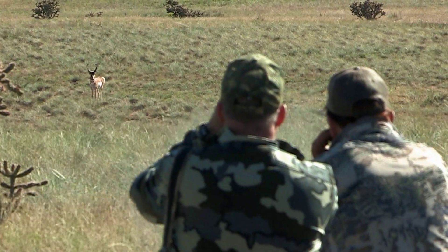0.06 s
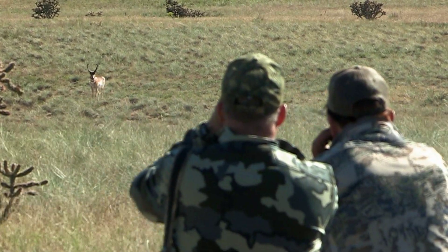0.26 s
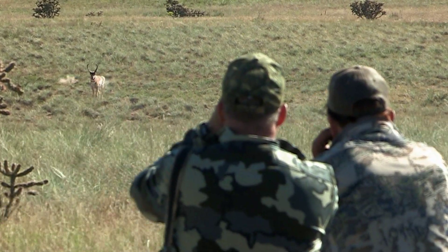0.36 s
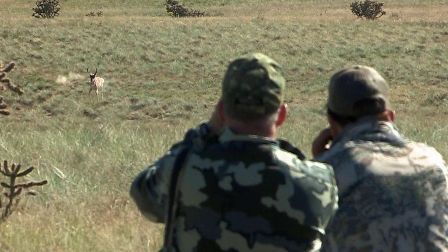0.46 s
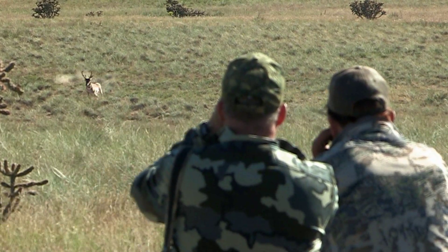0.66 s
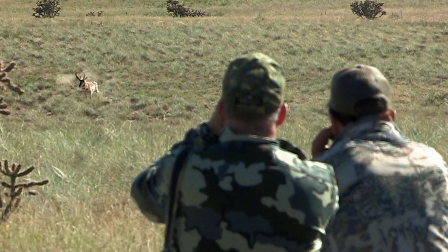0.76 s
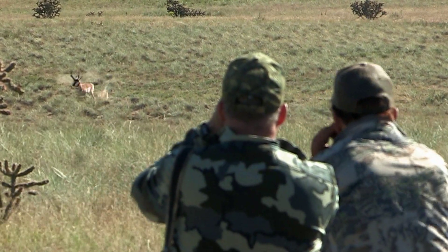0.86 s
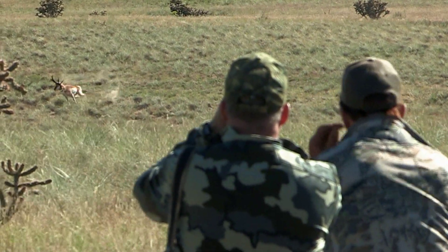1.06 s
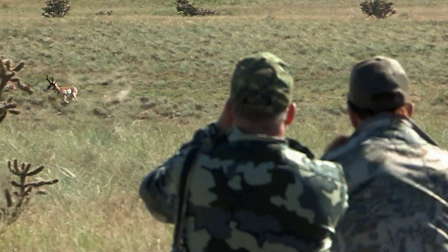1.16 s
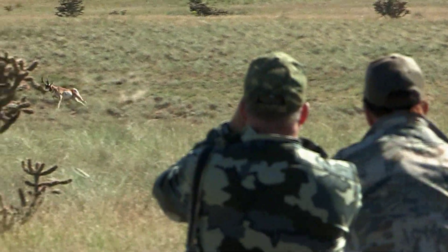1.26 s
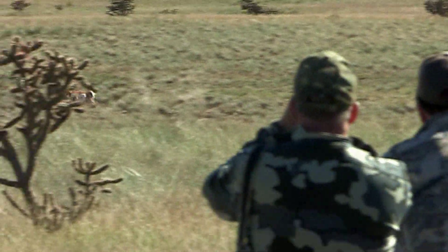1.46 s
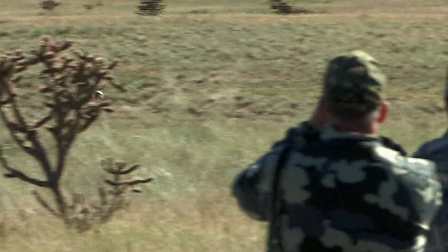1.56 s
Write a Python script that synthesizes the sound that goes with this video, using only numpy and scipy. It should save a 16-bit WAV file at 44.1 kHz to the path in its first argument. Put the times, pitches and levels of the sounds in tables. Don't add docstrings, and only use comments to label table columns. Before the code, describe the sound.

One close, overloaded gunshot with a sharp crack and hollow blast, then a fading echo outdoors

```python
import sys
import numpy as np
from scipy import signal
from scipy.fft import rfft, irfft
from scipy.io import wavfile
from scipy.ndimage import uniform_filter1d

SR = 44100
rng = np.random.default_rng(int(sys.argv[2]) if len(sys.argv) > 2 else 0)


def elevation(decibels):
    levels = np.asarray(decibels, float)
    return 10 ** (levels / 20)


def int16_out(signal):
    q = np.round(np.clip(np.atleast_2d(signal).T, -1, 1) * 32767)
    wavfile.write(sys.argv[1], SR, q.astype(np.int16))


N = 70560
SHOT_S = 0.2693


def evened(x):
    return x / np.sqrt(np.mean(x ** 2) + 1e-20)


def steady(x, size):
    return x / np.sqrt(uniform_filter1d(x ** 2, size) + 0.24)


def wander(size):
    return evened(uniform_filter1d(uniform_filter1d(rng.standard_normal(N), size), size))


def read(points, hz):
    f, value = np.transpose(points)
    return np.interp(np.log(hz + 1), np.log(f + 1), value)


def curve(points, t):
    return np.interp(t, *np.transpose(points))


def coloured(points):
    hz = np.fft.rfftfreq(N, 1 / SR)
    edge = np.minimum(hz / points[0][0], 1) ** 2
    spectrum = rfft(rng.standard_normal(N)) * elevation(read(points, hz)) * edge
    return evened(irfft(spectrum, N))


def resonate(x, hz, width):
    turn = np.exp(2j * np.pi * hz * np.arange(len(x)) / SR)
    r = np.exp(-np.pi * width / SR)
    smoothed = signal.lfilter([1 - r], [1, -r], x / turn + 1e-18)
    return 2 * (turn * smoothed).real


def burst(rise, hold, t60, start=SHOT_S):
    t = np.arange(N) / SR - start
    return np.clip(t / rise, 0, 1) * elevation(-60 * np.maximum(t - hold, 0) / t60)


def swell(middle, length):
    return np.exp(-((np.arange(N) / SR - middle) / length) ** 2)


def snaps(table):
    out = np.zeros(N + 2000)
    t = np.arange(2000) / SR
    for s, db, hz, width, t60 in table:
        snap = rng.standard_normal(2000)
        for _ in range(3):
            snap = resonate(snap, hz, width)
        start = round(s * SR)
        rise = np.minimum(t / 0.00074, 1)
        out[start:start + 2000] += evened(snap) * rise * elevation(db - 60 * t / t60)
    return out[:N]


def wind():
    # (time [s], level [dB])
    gusts = [(0.0, -24.5), (0.034, -23.5), (0.088, -24.5), (0.114, -22.5), (0.19, -25.5), (0.218, -22),
             (0.248, -20), (0.276, -16), (0.328, -22.5), (0.48, -22), (0.498, -28), (0.552, -27),
             (0.752, -28), (0.79, -35.5), (.82, -31.5), (0.926, -33), (1.398, -35.5), (1.438, -30),
             (1.6, -29.5)]
    # (frequency [Hz], level per Hz [dB])
    wind_colour = [(12, -50.5), (20, -6.5), (65, -0.5), (248, -16.5), (354, -19.5), (573, -24.5),
                   (677, -27.5), (1380, -30), (3000, -42.5), (3900, -53), (6600, -120)]
    lump_top_hz, lumps_db = 221, 1.5
    x = coloured(wind_colour)
    low = signal.sosfiltfilt(signal.butter(2, lump_top_hz, fs=SR, output="sos"), x)
    gust_db = curve(gusts, np.arange(N) / SR)
    roar_db = 0.68 * uniform_filter1d(gust_db, size=2000) - 10.0
    buffeting = steady(low, size=2500) * elevation(gust_db + lumps_db * wander(size=500))
    return buffeting + (x - low) * elevation(roar_db)


def drone():
    low_hz, top_hz, level_db = 700, 1720, -48
    sos = signal.butter(6, [low_hz, top_hz], "band", fs=SR, output="sos")
    band = signal.sosfilt(sos, rng.standard_normal(N))
    return evened(band) * elevation(level_db) * swell(1.42, 0.19)


def rustle():
    # (time [s], level [dB])
    hiss_level = [(0, -47.5), (.033, -51.5), (.038, -39.5), (.09, -45), (.14, -40.5), (.195, -45), (.2, -42),
                  (.27, -40), (.4, -73), (1.05, -71), (1.15, -60.5), (1.22, -60), (1.26, -56), (1.31, -58),
                  (1.45, -55), (1.56, -52.5), (1.6, -48.5)]
    # (frequency [Hz], level per Hz [dB])
    hiss_colour = [(880, -12), (1500, -15), (2470, 4), (2670, -3.5), (3960, -1.5), (9370, -6), (15600, -15)]
    # (frequency [Hz], level per Hz [dB])
    brush_colour = [(88, -31), (150, 0), (400, -22), (505, -8.5), (1050, -16), (8000, -34), (10400, -57.5),
                    (17600, -120)]
    brush_s, brush_db, brush_rise_s = 0.202, -29.5, 0.002
    z = signal.stft(coloured(hiss_colour), nperseg=256, noverlap=192)[2]
    patches = uniform_filter1d(rng.standard_normal(z.T.shape), 25, 0)
    patches = evened(uniform_filter1d(patches, 10, 1)).T
    hiss = evened(signal.istft(z * elevation(2.0 * patches), nperseg=256, noverlap=192)[1][:N])
    hiss = hiss * elevation(curve(hiss_level, np.arange(N) / SR) + 0.81 * wander(size=150))
    brush_shape = burst(brush_rise_s, SHOT_S - brush_s, 0.14, brush_s)
    return hiss + elevation(brush_db) * coloured(brush_colour) * brush_shape


def noise_swells():
    # (middle [s], level [dB], pitch [Hz], width [Hz], length [s])
    soft_swells = [(1.26, -61, 7500, 3000, .015), (1.26, -54, 3500, 1800, .03), (.055, -46, 2500, 3000, .015),
                   (1.587, -52, 11500, 3000, .012), (.236, -44, 4300, 300, .01), (1.52, -61, 12500, 5000, .04),
                   (.352, -30, 800, 800, .025), (.397, -31, 2000, 2500, .01), (.462, -38, 2200, 2500, .018),
                   (1.137, -64, 10000, 6000, .01), (.235, -36, 270, 120, .02), (.853, -47, 2000, 1400, .03)]
    out = np.zeros(N)
    for s, db, hz, width, length in soft_swells:
        band = resonate(resonate(rng.standard_normal(N), hz, width), hz, width)
        out += elevation(db) * evened(band) * swell(s, length)
    return out


def ticks():
    # (time [s], level [dB], pitch [Hz], width [Hz], t60 [s])
    small_snaps = [(0.3258, -20, 7460, 2500, 0.0088), (.480, -40, 11920, 6000, .008),
                   (.938, -45, 6960, 4000, 0.0074), (.941, -46, 11000, 8000, .006),
                   (.988, -48, 5000, 3500, .015), (1.004, -46.5, 4500, 4000, 0.042),
                   (1.004, -40.5, 2980, 2000, 0.029), (1.021, -62, 12800, 4000, .005),
                   (1.051, -45, 3950, 2000, 0.0084), (1.063, -59, 12000, 6960, 0.0056),
                   (1.176, -48, 12000, 6000, 0.023), (1.18, -46, 11000, 6000, .006),
                   (.847, -44, 2560, 1500, .04), (.801, -44, 3900, 1500, 0.034)]
    return snaps(small_snaps)


def knocks():
    # (middle [s], level [dB], pitch [Hz], length [cycles])
    swings = [(.302, -4.5, 277, 2.57), (.291, -8.5, 516, 3.3), (.2985, -12.5, 636, 5),
              (.2706, -7.5, 5100, 2.4), (.272, -12, 11800, 4), (0.25, -10, 3200, 0.66),
              (.282, -9.5, 9700, .7), (.2855, -12, 6600, 0.41), (0.32, -13, 2600, 0.57),
              (.2932, -13, 7000, 0.77), (0.36, -23, 6500, 3.5), (1.0071, -19, 190, 0.54),
              (0.95, -29, 650, 1.1), (1.312, -37.5, 520, 5.8), (0.47, -21, 146, 4.4),
              (.472, -20, 102.4, 2.6), (0.31, -23, 47, 1.1), (.57, -24, 42.3, 2), (.67, -25, 39.6, 2.5),
              (0.51, -29, 154, 4.4), (1.452, -27, 108, 2), (0.25, -23.5, 70, 2.3),
              (1.1797, -26.5, 12300, 2.5), (1.3, -36, 8300, 1.7), (1.1797, -36, 4500, 1.3),
              (1.1542, -48, 14000, .8), (1.1542, -39, 4000, 1.2), (1, -42, 7000, 1.8),
              (.9415, -44, 12500, 2)]
    out = np.zeros(N)
    for s, db, hz, cycles in swings:
        u = (np.arange(N) / SR - s) * hz
        out -= elevation(db) * np.cos(2 * np.pi * u) * np.exp(-(u / cycles) ** 2)
    return out


def echo():
    # (time [s], level [dB])
    roll = [(.3, -17), (.33, -27), (.38, -25), (.48, -31.5), (.51, -32), (.74, -36), (.78, -40.5),
            (.93, -43.5), (1.1, -49)]
    # (frequency [Hz], level per Hz [dB])
    roll_colour = [(59, -31), (100, -3), (621, -7), (836, -11.5), (970, -16.5), (1450, -14.5),
                   (10500, -30.5), (16000, -36.5)]
    returns_s = [.316, .345, .385, .398, .462, .853, .92]
    # (level relative to the roll [dB], length [s])
    returns = [(5, .005), (1.5, .025), (1, .012), (-4, .008), (5, .02), (2, .02), (2, .02)]
    air_db_per_s, air_power = 36, 2.35
    flicker_db, patch_db = 0.8, 1.2
    frames = N // 64 + 5
    hz = np.fft.rfftfreq(256, 1 / SR)[:, None]
    a, b, patches = rng.standard_normal((frames, 129, 3)).T
    patches = evened(uniform_filter1d(uniform_filter1d(patches, 8, 0), 20, 1))
    late = np.maximum(np.arange(frames) * 64 / SR - roll[0][0], 0)
    air_loss_db = air_db_per_s * late * (hz / 10000) ** air_power
    colour = elevation(read(roll_colour, hz)) * np.minimum(hz / 150, 1)
    z = (a + 1j * b) * colour * elevation(patch_db * patches - air_loss_db)
    scatter = evened(signal.istft(z, nperseg=256, noverlap=192)[1][:N])
    t = np.arange(N) / SR
    level_db = curve(roll, t) + flicker_db * wander(size=300)
    for s, (db, length) in zip(returns_s, returns):
        level_db += db * swell(s, length)
    level_db -= 30 * np.maximum(t - roll[-1][0], 0)
    return scatter * elevation(level_db + 2.0) * burst(0.024, 9, 1)


def cracks():
    # (time [s], level [dB], pitch [Hz], width [Hz], t60 [s])
    shot_snaps = [(0.3, -31, 4000, 7300, 0.042), (.268, -26.5, 5600, 7000, 0.027),
                  (0.271, -11.5, 5400, 3500, 0.013), (0.271, -15, 15070, 3000, .018),
                  (0.2709, -13, 11550, 3000, 0.018), (.2712, -8, 940, 500, 0.03),
                  (0.271, -11.5, 2260, 2500, .02), (0.2747, -10, 1700, 1200, 0.016),
                  (0.2757, -18.5, 5000, 7000, 0.0067), (0.2782, -10.5, 4500, 6000, 0.012),
                  (0.2818, -5.5, 3000, 3500, 0.013), (0.2828, -12, 7050, 8000, 0.012),
                  (0.283, -14, 6000, 8000, .01), (0.287, -18, 4500, 7000, 0.014),
                  (0.2918, -19, 11460, 3490, 0.011), (0.2929, -21, 3490, 6000, 0.0099),
                  (.297, -19, 4000, 7000, 0.021), (0.28, -24, 2150, 1800, 0.033)]
    return snaps(shot_snaps)


def blast():
    # (pitch [Hz], width [Hz], level [dB], peak after [s], t60 [s])
    hollows = [(272, 58, -10, 0.036, 0.022), (362.6, 142, -3, 0.012, 0.2), (523.6, 119, 0.5, 0.023, 0.05),
               (662, 80, -1.5, 0.03, 0.043), (794, 86, -7.5, 0.029, 0.1), (924, 187, -6, 0.025, 0.13),
               (1700, 1100, -10.5, 0.0051, 0.071), (98, 32, -22, 0.013, 0.14)]
    # (frequency [Hz], level per Hz [dB])
    fizz_colour = [(530, -41), (900, -2), (2330, 1), (2760, 1.5), (6250, -10), (12400, -17), (16000, -30)]
    shocks_per_s, shock_s, shock_spread_db = 1500, 0.00025, 3
    blast_db, blast_rise_s = 0.5, 0.0055
    crack_db, crack_rise_s, crack_t60_s, crack_hz = -13, 0.00088, 0.018, 4500
    fizz_db, fizz_rise_s, fizz_hold_s, fizz_t60_s = -14, 0.0035, 0.021, 0.036
    push_db, push_s, push_fade, push_sag = -7, 0.004, 0.22, 0.62

    u = np.arange(400) / SR / shock_s
    shock = (1 - u) * np.exp(-u)
    hits = (rng.random(N) < shocks_per_s / SR) * elevation(shock_spread_db * rng.standard_normal(N))
    shocks = np.convolve(hits * rng.choice([-1, 1], N), shock)[:N]
    body = np.zeros(N)
    for hz, width, db, peak, t60 in hollows:
        ring = evened(resonate(resonate(shocks, hz, width), hz, width))
        shape = burst(max(peak, blast_rise_s), peak, t60) ** 0.67
        body += elevation(db) * steady(ring, size=400) * shape

    sos = signal.butter(2, crack_hz, "high", fs=SR, output="sos")
    crack = signal.sosfilt(sos, rng.standard_normal(N))
    crack = crack * burst(crack_rise_s, 2 * crack_rise_s, crack_t60_s)
    fizz = coloured(fizz_colour) * elevation(2.76 * wander(size=25))
    fizz = fizz * burst(fizz_rise_s, fizz_hold_s, fizz_t60_s)
    v = np.maximum(np.arange(N) / SR - SHOT_S - 0.002, 0) / push_s
    push = -np.sin(np.pi * v ** push_sag) * np.exp(-push_fade * v)
    return elevation(blast_db) * body / 2 + elevation(push_db) * push + elevation(crack_db) * crack + elevation(fizz_db) * fizz


def scene():
    background = wind() + drone() + rustle() + noise_swells()
    details = ticks() + knocks()
    shot = echo() + cracks() + blast()
    return (background + details + shot)[None]


def top_cut(x):
    return signal.sosfilt(signal.butter(12, 16320, fs=SR, output="sos"), x)


def record(dry):
    knee, ceiling, drive_db, edge_hz = 5.0, 1.0, 0.3, 15900
    dry = dry / elevation(drive_db)
    held = dry / (1 + abs(dry / ceiling) ** knee) ** (1 / knee)
    band_limit = signal.firwin(401, edge_hz, window=("kaiser", 8), fs=SR)
    held = signal.oaconvolve(held, band_limit[None], "same")
    return top_cut(np.clip(held * elevation(drive_db), -1, 1))


dry = scene()
out = record(dry)
int16_out(out)
```